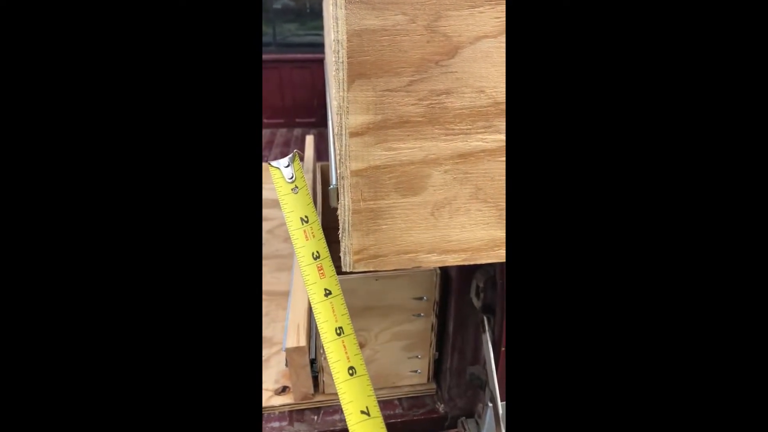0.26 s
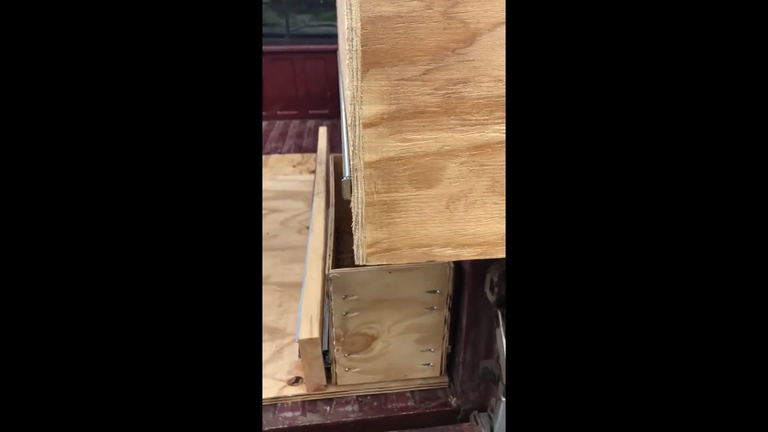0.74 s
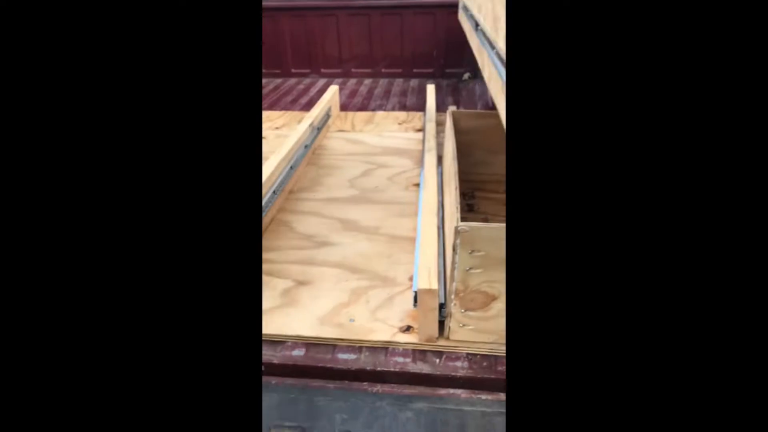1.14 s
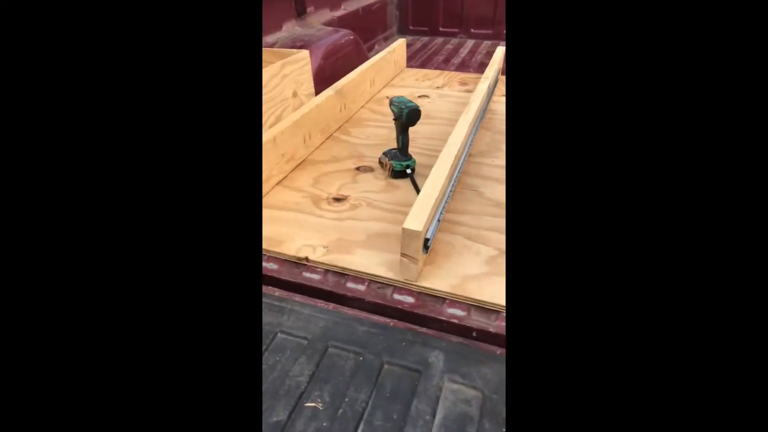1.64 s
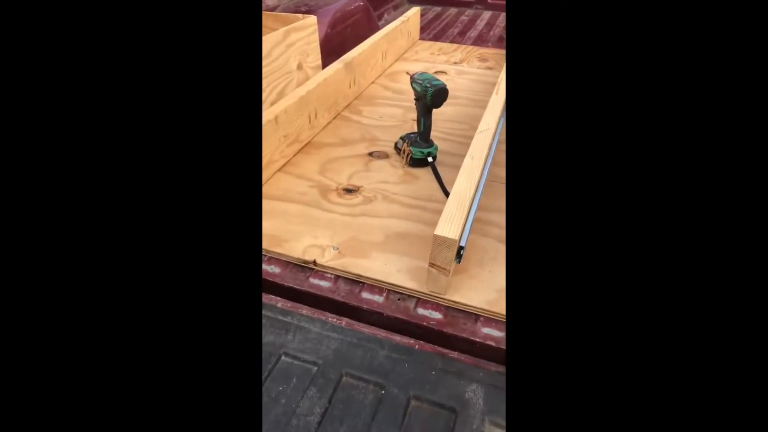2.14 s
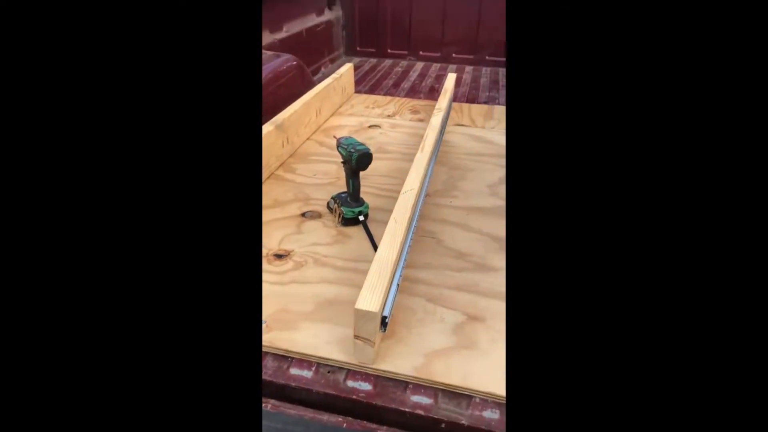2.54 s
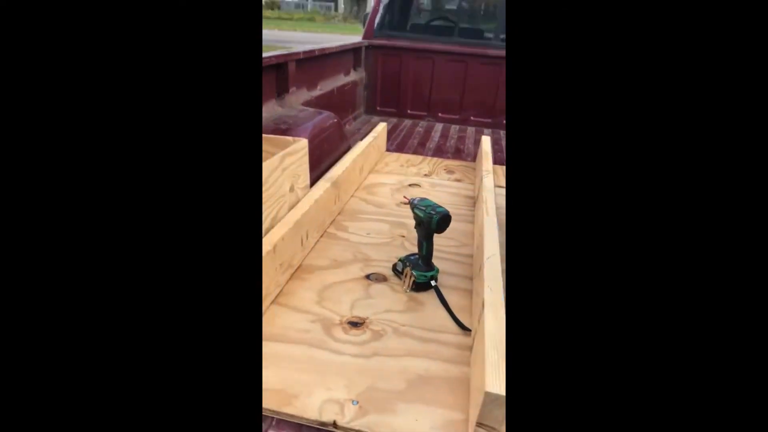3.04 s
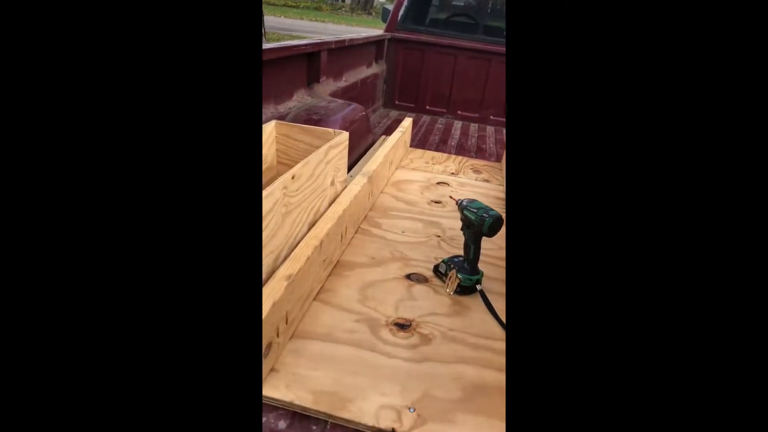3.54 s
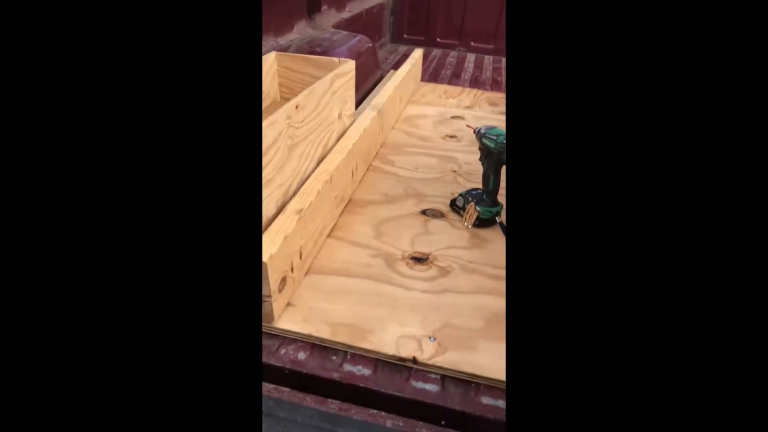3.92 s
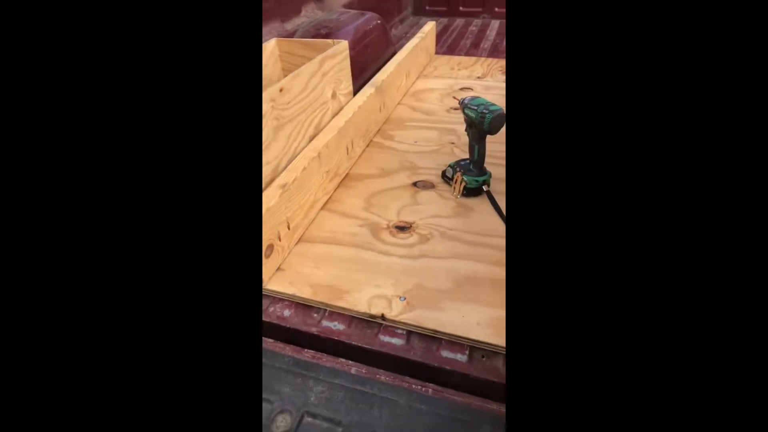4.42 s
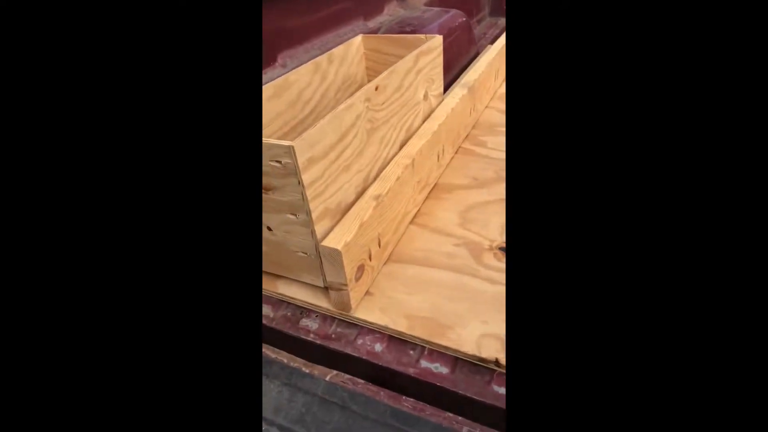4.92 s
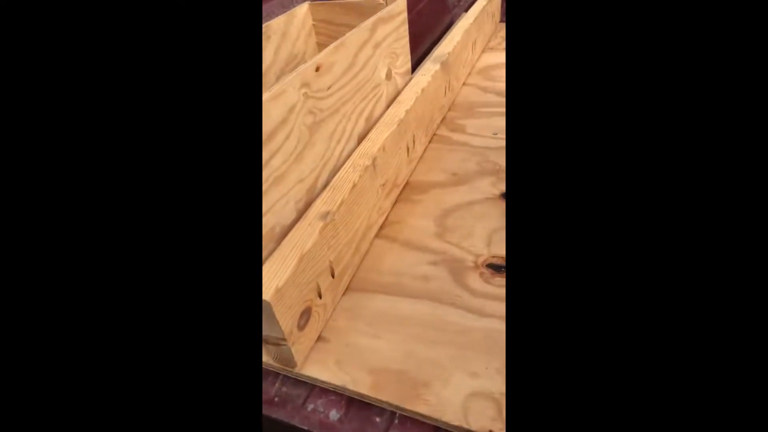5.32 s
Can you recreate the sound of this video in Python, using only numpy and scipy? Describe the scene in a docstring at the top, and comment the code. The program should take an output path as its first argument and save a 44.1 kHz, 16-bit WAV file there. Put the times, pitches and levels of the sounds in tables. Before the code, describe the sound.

A tape measure whirs shut and clatters onto plywood, then a wooden drawer is shoved along with hollow thumps and scrapes.

```python
"""Outdoors, at a plywood deck on a truck bed. A steel tape measure is let go, whirs into its case
and snaps shut; after a light brush the case clatters down and skids. A plywood drawer is bumped and
shoved along the deck: wood rubs and snags, its steel runner clinks and the bed booms.
Heard close, through a small microphone with a limiter, over a distant rumble."""
import sys
import numpy as np
from scipy import signal
from scipy.fft import rfft, irfft, next_fast_len
from scipy.io import wavfile
from scipy.ndimage import uniform_filter1d, minimum_filter1d, map_coordinates

SR = 44100
rng = np.random.default_rng(int(sys.argv[2]) if len(sys.argv) > 2 else 0)


def wav_record(signal):
    """Record a signal, one row per channel, as 16-bit PCM in the file named by sys.argv[1]."""
    frames = np.transpose(np.atleast_2d(signal))
    bounded = np.clip(frames, -1, 1)
    # unit amplitude maps onto the largest positive 16-bit level
    quanta = np.round(bounded * 32767).astype(np.int16)
    wavfile.write(sys.argv[1], SR, quanta)


N = 245833
AGE_S = np.arange(SR) / SR  # time since a blow

# modes of tape shell and spring, and of plywood deck: (frequency [Hz], level [dB], base t60 [s])
SHELL_MODES = [(1780, -3, .015), (2540, -6, .035), (2760, -2, .025), (3140, 0, .025), (3470, -8, .06),
               (3610, -11, .06), (4900, -8, .03), (5380, -10, .03), (6220, -8, .02), (6600, -7, .035),
               (6780, -7, .04), (7710, -8, .025)]
DECK_MODES = [(178.6, -12, 0.94), (343.6, 7, 0.18), (420, 0, 0.063), (479.4, -4, 0.17), (636, -5.5, 0.13),
              (736, -24.5, 0.46), (977, -40, 0.6), (1051, -37.5, .25), (1370, -33.5, .2),
              (1445, -13.5, 0.12)]
# impact spectra: (frequency [Hz], level [dB])
CLACK_SPECTRUM = [(300, -28), (600, 5.5), (960, 2), (1300, -1.5), (2000, -6), (3000, -17), (6000, -37)]
HOLLOW_SPECTRUM = [(150, -15), (270, -4.5), (335, 5), (430, 8), (500, -3.5), (650, -15), (1200, -38.5),
                   (3000, -54.5)]
CLICK_SPECTRUM = [(900, -26), (1900, 2.5), (2700, 4.5), (3800, 8), (5000, 5), (6500, 0.5), (9000, -6.5),
                  (13000, -25), (16000, -26.5)]
SPLINTER_SPECTRUM = [(3000, -26), (6000, 1), (8000, 2.5), (11000, -4.5), (13000, -8), (16000, -11.5)]


def amp(db):
    """Decibels to gain."""
    return 10 ** (np.asarray(db) / 20)


def unit(x):
    """Scale to rms 1."""
    return x / np.sqrt(np.mean(x ** 2) + 1e-20)


def add(track, time_s, sound):
    """Mix a sound into the track at time_s."""
    part = track[round(time_s * SR):][:len(sound)]
    part += sound[:len(part)]


def wobble(rate_hz):
    """Smooth random curve, knots at rate_hz."""
    knots = rng.standard_normal(int(N * rate_hz / SR) + 4)
    return map_coordinates(knots, [np.arange(N) * rate_hz / SR])


def swell(start_s, end_s, rise_s, fall_db_per_s):
    """Gain: up 20 dB per rise_s until start_s, held to end_s, then falling."""
    t = np.arange(N) / SR
    return amp(-20 * np.maximum(start_s - t, 0) / rise_s - fall_db_per_s * np.maximum(t - end_s, 0))


def coloured(x, spectrum):
    """Shape x by a spectrum; rms 1."""
    size = next_fast_len(len(x))
    hz, db = np.transpose(spectrum)
    gain = amp(np.interp(np.log(np.fft.rfftfreq(size, 1 / SR) + 1), np.log(hz), db))
    return unit(irfft(rfft(x, size) * gain, size)[:len(x)])


def friction(spectrum, rate_hz, spread_db, smooth):
    """Tiny uneven slips over a smooth rush."""
    slips = (rng.random(N) < rate_hz / SR) * rng.standard_normal(N)
    slips *= amp(spread_db * np.minimum(rng.exponential(size=N), 4))
    return coloured(unit(slips) + smooth * rng.standard_normal(N), spectrum)


def burst(spectrum, attack_s, t60_s, tail_db, tail_t60_s):
    """Crowded modes after a blow: quick fall, then a weaker, longer tail."""
    t = AGE_S[:SR // 2]
    fall = amp(-60 * t / t60_s) + amp(tail_db - 60 * t / tail_t60_s)
    return coloured(rng.standard_normal(len(t)), spectrum) * fall * (1 - np.exp(-t / attack_s))


def ring(modes, attack_s, damping, scatter_db):
    """Separate modes, varied per contact point; damping divides the base t60."""
    hz, db, t60_s = np.transpose(modes)[:, :, None]
    strength, detune, sign = rng.standard_normal((3, len(modes), 1))
    gain = amp(db + scatter_db * strength)
    waves = np.sign(sign) * np.sin(2 * np.pi * hz * (1 + .015 * detune) * AGE_S)
    waves *= amp(-60 * AGE_S * damping / t60_s)
    return (gain * waves).sum(0) / np.linalg.norm(gain) * (1 - np.exp(-AGE_S / attack_s))


def crack(spectrum, length_s, tail_db, tail_t60_s, ripple_db):
    """Hard contact, then its scatter off the boards; colour varies per contact point."""
    t = AGE_S[:SR // 3]
    bands_hz = np.geomspace(300, 16000, num=36)
    hz, db = np.transpose(spectrum)
    bands_db = np.interp(np.log(bands_hz), np.log(hz), db)
    bands_db += ripple_db * rng.standard_normal(len(bands_hz))
    fall = np.exp(-(t / length_s) ** 4) + amp(tail_db - 60 * t / tail_t60_s)
    noise = coloured(rng.standard_normal(len(t)), np.c_[bands_hz, bands_db])
    return noise * fall * (1 - np.exp(-t / .00041))


def bounces(time_s, gap_s, gap_ratio, loss_db, levels_db, count):
    """Ever weaker contacts: rows of (time [s], levels [dB])."""
    k = np.arange(count)
    times_s = time_s + np.r_[0, np.cumsum(gap_s * gap_ratio ** k[:-1])]
    return np.c_[times_s, np.array(levels_db) - np.array(loss_db) * k[:, None]]


def distant_rumble():
    """Low outdoor background."""
    # rumble spectrum: (frequency [Hz], level [dB])
    spectrum = [(20, -25), (35, -17.5), (60, 0.5), (100, 2.5), (130, -5), (175, -2.5), (270, -11),
                (400, -18), (750, -18), (1130, -18), (1600, -22.5), (3000, -32), (6000, -42), (16000, -53)]
    return amp(-55 + .27 * wobble(8)) * coloured(rng.standard_normal(N), spectrum)


def tape_blade():
    """A spring reels the blade in: it hisses through the slot, whips at speed; the hook slams home."""
    # loose blade, lifted and drawn in: (time [s], relative level [dB], t60 [s])
    chatter = [(0.7741, -31.5, 0.069), (0.7874, -39, 0.062), (0.8664, -35.5, 0.13), (0.9057, -33, 0.098),
               (0.918, -33, 0.046), (1.226, -40, 0.082), (1.248, -24.5, 0.18), (1.418, -24, 0.16)]
    # blade and hook hit the case: (time [s], relative click [dB], relative knock [dB])
    strikes = [(1.245, -41, -50.5), (1.257, -39, -49.5), (1.452, -32, -49.5), (1.482, -35.5, -63),
               (1.5949, -21, -48), (1.607, -9.5, -33), (1.622, -25.5, -54.5)]
    # blade spectra: (frequency [Hz], level [dB])
    hiss_spectrum = [(1000, -48), (2300, -18.5), (2900, -11), (3350, 0), (4300, -3), (5600, -0.5),
                     (6500, -4), (7700, 2), (9200, -3.5), (12000, -4), (15000, -5.5), (16000, 1)]
    rattle_spectrum = [(120, -29.5), (250, 0.5), (400, -10.5), (600, -0.5), (800, -10), (1400, -11.5),
                       (2000, -2), (3100, -2), (4100, -6), (6100, -1.5), (8000, -10), (11000, -27),
                       (16000, -37)]
    chatter_spectrum = [(1600, -27), (2400, -9), (3200, -1.5), (4500, -3.5), (6500, -4.5), (9000, -6),
                        (13000, -15), (16000, -10.5)]
    snap_spectrum = [(900, -17.5), (1500, -14.5), (1800, -0.5), (2200, -14.5), (3100, -1.5), (4100, -10.5),
                     (6600, -6), (8200, -11), (10500, -14.5), (12000, -22), (16000, -22.5)]
    release_s, whip_s, home_s = 1.231, 1.456, 1.6
    slap_count, slap_gap_s = 4, .047

    running = swell(release_s, home_s, rise_s=.016, fall_db_per_s=497)
    whipping = swell(whip_s, home_s, rise_s=.07, fall_db_per_s=497)
    hiss = amp(-41 + 1.7 * wobble(150)) * friction(hiss_spectrum, 11000, spread_db=5, smooth=1.1)
    rattle = amp(-41 + 1.6 * wobble(120)) * friction(rattle_spectrum, 2000, spread_db=2, smooth=.7)
    out = running * hiss + whipping * rattle
    shell = ring(SHELL_MODES, attack_s=.0003, damping=1.8, scatter_db=1)
    out += amp(-10.5) * signal.fftconvolve(out, shell / np.linalg.norm(shell))[:N]
    for time_s, db, t60_s in chatter:
        add(out, time_s, amp(db - 9.5) * burst(chatter_spectrum, .00073, t60_s, -33, tail_t60_s=.12))

    jitter, size = rng.uniform(-1, 1, (slap_count, 2)).T
    slaps_s = whip_s + slap_gap_s * (np.arange(slap_count) + 1 + .5 * jitter)
    slaps = np.c_[slaps_s, -33.5 + 3 * size, -61 + 3 * size]
    for time_s, click_db, knock_db in np.vstack([strikes, slaps]):
        add(out, time_s, amp(click_db) * crack(snap_spectrum, .0045, -17, .15, ripple_db=1.5))
        add(out, time_s, amp(click_db + 1) * ring(SHELL_MODES, .0005, damping=1.3, scatter_db=2))
        add(out, time_s, amp(knock_db + 3.5) * burst(CLACK_SPECTRUM, .00067, .0043, -5.5, .18))
        add(out, time_s, amp(knock_db) * burst(HOLLOW_SPECTRUM, .0059, .042, -10, .25))
    return out


def stroke_gains():
    """Shudder, rub and grit gains, power-summed over the rubbing strokes."""
    # a light brush, the tape case skidding on the deck, then the drawer's shoves:
    # (full speed at [s], rise [s per 20 dB], hold [s], speed fall [dB/s],
    # relative shudder [dB], relative rub [dB], relative grit [dB])
    strokes = [(1.805, 0.083, 0.086, 80, -57.5, -64, -57), (2.003, 0.033, 0.012, 171, -20, -18, -32.5),
               (2.143, 0.017, 0.15, 90, -34, -38, -43.5), (2.449, 0.034, 0.016, 273, -29.5, -30.5, -41.5),
               (2.574, 0.12, .14, 46, -41.5, -75, -64), (2.736, 0.23, 0.025, 100, -32.5, -44, -55.5),
               (2.858, 0.065, 0.13, 35.5, -11.5, -29.5, -42), (3.39, 0.15, 0.07, 167, -23.5, -36.5, -59.5),
               (3.638, 0.056, 0.15, 160, -13.5, -31.5, -40), (3.936, 0.087, 0.059, 292, -14, -23.5, -34.5),
               (4.066, 0.075, 0.21, 101.5, -11.5, -31, -37.5), (5.16, 0.45, .03, 12, -42.5, -57.5, -64),
               (5.483, 0.2, 0.11, 100, -44.5, -47, -57)]
    power = np.zeros((3, N))
    for time_s, rise_s, hold_s, fall_db_per_s, shudder_db, rub_db, grit_db in strokes:
        speed = swell(time_s, time_s + hold_s, rise_s, fall_db_per_s)
        linger = amp(-12.5) * swell(time_s, time_s + hold_s, rise_s, 36)  # bed rumbles on
        power[0] += (amp(shudder_db) * np.maximum(speed, linger)) ** 2
        power[1] += (amp(rub_db) * np.maximum(speed, amp(-6) * linger)) ** 2
        power[2] += (amp(grit_db) * speed ** 1.315) ** 2  # grit dies faster
    return np.sqrt(power)


def deck_rubbing():
    """Friction on plywood: the bed shudders, panels rub, fibres catch under a hard push."""
    # sliding spectra: (frequency [Hz], level [dB])
    shudder_spectrum = [(20, -60.5), (35, -34), (55, -8), (80, -4.5), (105, -3), (150, -3.5), (188, -2.5),
                        (271, -9), (327, -9.5), (400, -26), (650, -62)]
    rub_spectrum = [(150, -34), (330, 5.5), (600, 4.5), (1000, -1.5), (1600, -11), (2800, -16.5),
                    (6000, -71.5)]
    grit_spectrum = [(700, -5.5), (1600, -3), (3000, 1.5), (4500, -0.5), (6500, -3.5), (9000, -9.5),
                     (13000, -18), (16000, -25.5)]
    brush_spectrum = [(2000, -26), (4000, -0.5), (7000, -1), (10000, -7), (16000, -11.5)]
    shudder, rub, grit = stroke_gains()
    bed = shudder * amp(-3) * friction(shudder_spectrum, 400, spread_db=-2.5, smooth=1)
    panels = rub * amp(-2 + .37 * wobble(40)) * friction(rub_spectrum, 440, spread_db=1, smooth=1)
    scrape = grit * amp(.5 + 2.8 * wobble(70)) * friction(grit_spectrum, 2200, spread_db=-2.5, smooth=1)
    light_touch = np.minimum(grit, amp(-68))
    brush = light_touch * amp(-5) * friction(brush_spectrum, 2300, spread_db=5, smooth=1.2)
    push = (grit / grit.max()) ** .35
    catch_rate_hz = 90
    catches = (rng.random(N) < catch_rate_hz / SR) * amp(3 * rng.standard_normal(N))
    fibre = crack(grit_spectrum, length_s=.002, tail_db=-18, tail_t60_s=.03, ripple_db=2)
    crackle = amp(-2) * signal.fftconvolve(catches * grit * push, fibre)[:N]
    return bed + panels + scrape + brush + crackle


def tape_case():
    """Plastic on plywood: the shell clicks, the board clacks, the deck rings hollow."""
    # case lands, tips, drops flat: (time [s], relative click [dB], clack [dB], deck ring [dB])
    blows = [(1.96, -12, -11, -13.5), (1.9746, -17, -19, -16.5), (2.136, -31.5, -29.5, -20.5),
             (2.189, -39, -30, -22.5), (2.4425, -30, -30.5, -20.5)]
    # settling runs: (time [s], first gap [s], gap ratio, loss per contact [dB],
    # relative click [dB], clack [dB], deck ring [dB])
    settling = [(2.0131, .0131, .96, 1.2, -32, -26.5, -24), (2.2389, .0468, .865, 3.6, -25.5, -47, -20.5)]
    # plastic click spectrum: (frequency [Hz], level [dB])
    plastic_spectrum = [(900, -29.5), (1800, -4), (2250, 1.5), (2700, -3), (3300, 2.5), (3900, -7.5),
                        (4900, -4.5), (6500, -8.5), (7900, -13.5), (9500, -17), (13000, -22.5),
                        (16000, -24)]
    contacts = []
    for time_s, *levels_db in blows:
        contacts.extend(bounces(time_s, .021, 1, loss_db=[6, 3, 3], levels_db=levels_db, count=2))
    for time_s, gap_s, gap_ratio, loss_db, *levels_db in settling:
        contacts.extend(bounces(time_s, gap_s, gap_ratio, loss_db, levels_db, count=5))
    out = np.zeros(N)
    for time_s, click_db, clack_db, deck_db in contacts:
        add(out, time_s, amp(click_db + 1) * crack(plastic_spectrum, .004, -18, .09, ripple_db=3))
        add(out, time_s, amp(click_db + 1) * ring(SHELL_MODES, .0003, damping=2, scatter_db=3))
        add(out, time_s, amp(clack_db + 2.5) * burst(CLACK_SPECTRUM, .0003, .021, -14.5, .21))
        add(out, time_s, amp(deck_db + 5) * ring(DECK_MODES, .0015, damping=1.2, scatter_db=1.5))
        add(out, time_s, amp(deck_db + 3) * burst(HOLLOW_SPECTRUM, .001, .055, -13.5, .4))
    return out


def runner_clinks():
    """The loose steel runner strikes its channel and rings briefly."""
    # jolts: (time [s], level [dB])
    jolts = [(2.2388, -17), (2.2856, -28), (3.5997, -28), (4.1953, 0.5), (4.739, -43.5)]
    # runner modes: (frequency [Hz], level [dB], base t60 [s])
    modes = [(2450, -9, .008), (2720, 0, .016), (3100, -8, .008), (3870, -15, .015), (4600, -14, .01),
             (6250, -7, .013), (6550, -6, .013), (7400, -9, .01), (8420, -13, .01), (11800, -12, .012)]
    out = np.zeros(N)
    for time_s, db in jolts:
        add(out, time_s, amp(db) * ring(modes, attack_s=.00018, damping=1.05, scatter_db=2.7))
    return out


def drawer_bumps():
    """Each bump cracks at the contact, knocks the panels, rings the deck and sets the bed booming."""
    # bumps: (time [s], relative click [dB], clack [dB], panel knock [dB], bed boom [dB])
    bumps = [(2.762, -60, -35.5, -33.5, -28), (2.815, -43.5, -26.5, -25, -18),
             (2.857, -33, -24.5, -45, -42), (2.87, -39, -27, -48.5, -50), (2.935, -60, -25, -25, -7.5),
             (3.136, -79, -31.5, -25.5, -18), (3.468, -58, -58, -25, -15.5), (3.5976, -20, -21, -10, -4.5),
             (3.706, -35, -27, -17.5, -12), (3.767, -58, -46, -22, -13), (3.863, -39.5, -43, -29, -14),
             (3.904, -57, -26, -40, -40), (3.946, -43, -34, -40, -11.5), (4.058, -31.5, -21.5, -6.5, -17.5),
             (4.129, -51.5, -38, -15, -12), (4.1954, -25, -26.5, -5.5, -25), (4.212, -32, -18.5, -25, -17),
             (4.242, -40.5, -25.5, -14.5, -9), (4.294, -36.5, -34, -18.5, -22),
             (5.148, -63, -58, -42.5, -57), (5.415, -56.5, -47.5, -33.5, -36),
             (5.558, -47, -44, -47, -26.5)]
    # panel knock spectrum: (frequency [Hz], level [dB])
    knock_spectrum = [(130, -48), (250, -4.5), (350, -3), (520, -7), (700, -14.5), (1200, -50.5),
                      (3000, -54.5)]
    # loaded truck bed modes: (frequency [Hz], level [dB], t60 [s])
    bed_modes = [(62.4, -15.5, 0.34), (84.9, -11.5, 0.97), (98, -6, 0.19), (124.7, -6.5, 0.34),
                 (152.1, 4.5, 0.44), (183.7, -4.5, 0.61), (198.5, 7, 0.29), (247.2, 5, 0.21),
                 (305.6, -7.5, 0.2)]
    out = np.zeros(N)
    for time_s, click_db, clack_db, knock_db, boom_db in bumps:
        add(out, time_s, amp(click_db) * crack(CLICK_SPECTRUM, .006, -5, .17, ripple_db=6))
        add(out, time_s, amp(click_db - 14) * crack(SPLINTER_SPECTRUM, .0044, -22, .071, ripple_db=-2.5))
        add(out, time_s, amp(clack_db + 4.5) * burst(CLACK_SPECTRUM, .00065, .041, -8.5, .38))
        add(out, time_s, amp(knock_db + 3) * burst(knock_spectrum, .003, .11, -22, .7))
        add(out, time_s, amp(knock_db - 6.5) * ring(DECK_MODES, .0015, damping=1.4, scatter_db=1.5))
        add(out, time_s, amp(boom_db + 4) * ring(bed_modes, .006, damping=1, scatter_db=2))
    return out


def drawer_snags():
    """A caught edge lets go: bright snap, click, small clack of the board."""
    # edge releases: (time [s], snap level [dB])
    snags = [(3.659, -35), (3.692, -32.5), (3.78, -33.5), (3.826, -41), (3.917, -31.5), (3.944, -26.5),
             (4.002, -27.5), (4.045, -33.5), (4.11, -32), (4.1943, -17.5), (4.266, -31.5), (4.319, -50),
             (4.346, -43), (4.36, -37.5), (4.373, -41), (4.4, -47)]
    out = np.zeros(N)
    for time_s, db in snags:
        add(out, time_s, amp(db) * crack(SPLINTER_SPECTRUM, .0048, -35, .071, ripple_db=4))
        add(out, time_s, amp(db + .5) * crack(CLICK_SPECTRUM, .0043, -10, .09, ripple_db=5))
        add(out, time_s, amp(db - 1) * burst(CLACK_SPECTRUM, .0015, .05, -.5, .067))
    return out


def scene():
    """All sources, mono."""
    on_deck = drawer_bumps() + drawer_snags() + deck_rubbing() + runner_clinks()
    return (tape_blade() + tape_case() + on_deck + distant_rumble())[None]


def record(dry):
    """Small microphone: bass cut, fast limiter, band limit."""
    low_cut_hz, top_hz, taper_hz, ceiling = 36, 16050, 600, .72
    heard = signal.sosfilt(signal.butter(2, low_cut_hz, "highpass", fs=SR, output="sos"), dry)
    needed_gain = np.minimum(1, ceiling / (np.abs(heard) + 1e-9))
    gain = uniform_filter1d(minimum_filter1d(needed_gain, size=120), size=80)
    size = next_fast_len(N + SR // 2)
    band = np.clip((top_hz - np.fft.rfftfreq(size, 1 / SR)) / taper_hz + .5, 0, 1)
    return irfft(rfft(heard * gain, size) * band, size)[:, :N]


dry = scene()
out = record(dry)
wav_record(out)
```